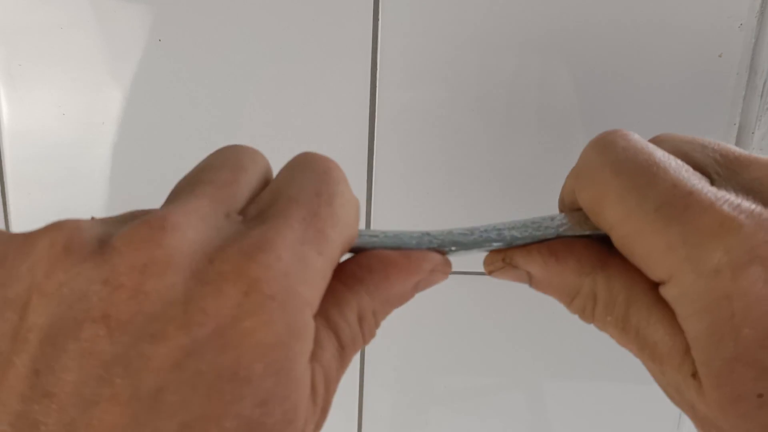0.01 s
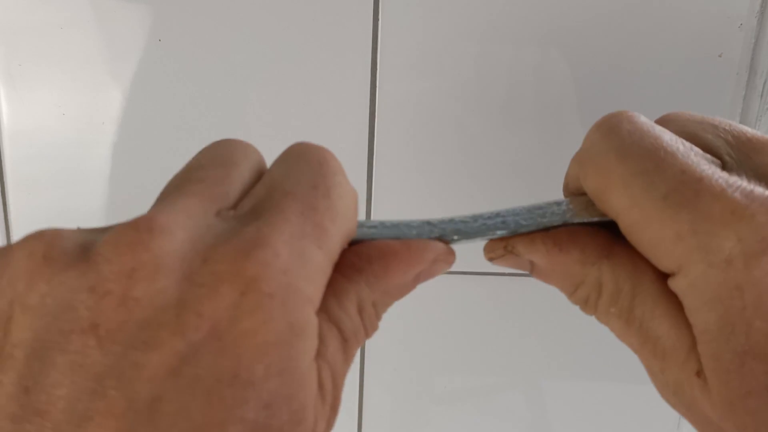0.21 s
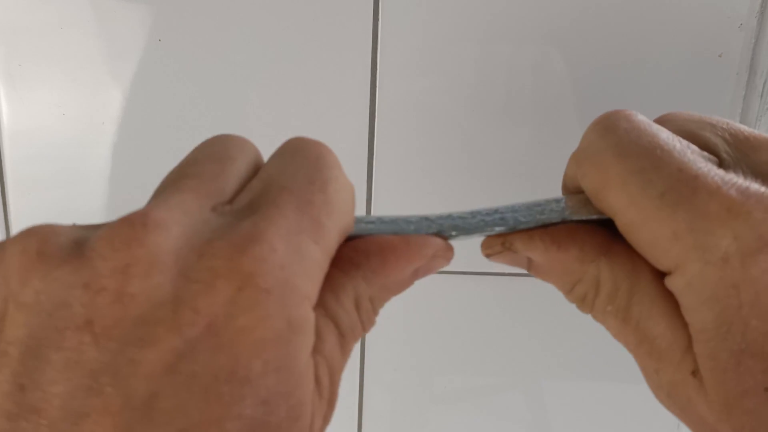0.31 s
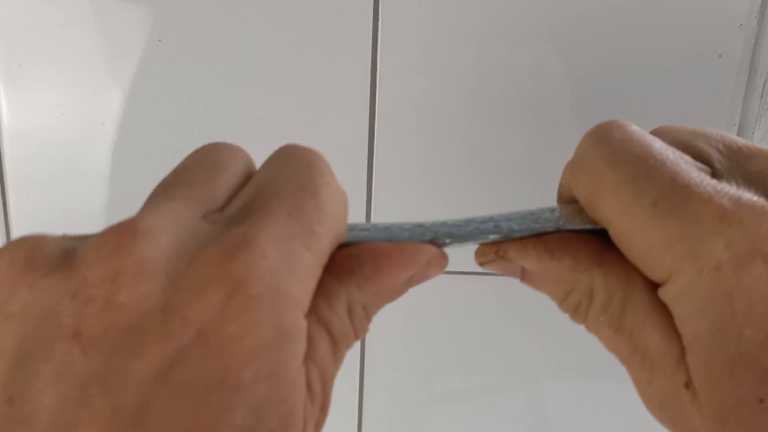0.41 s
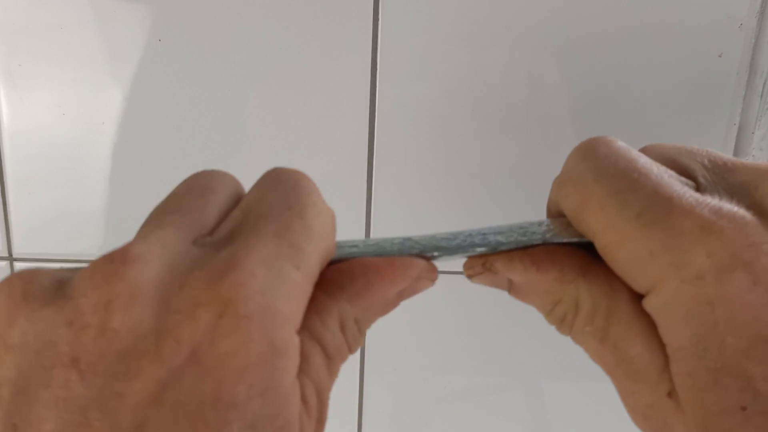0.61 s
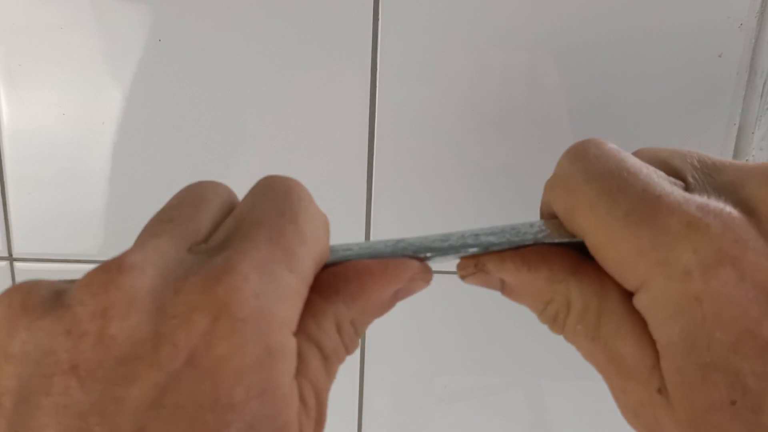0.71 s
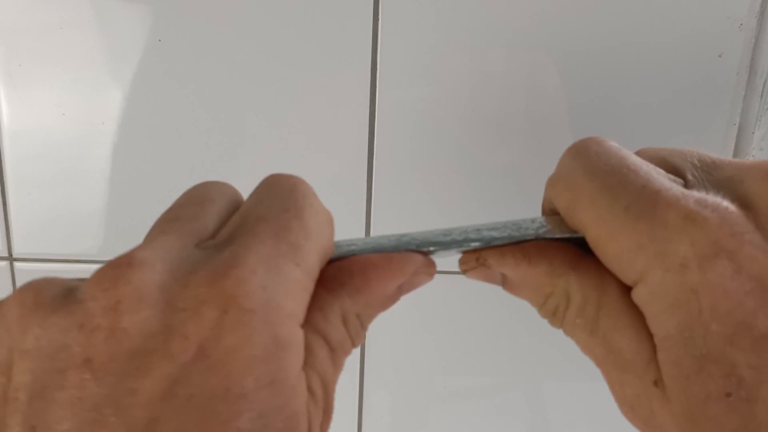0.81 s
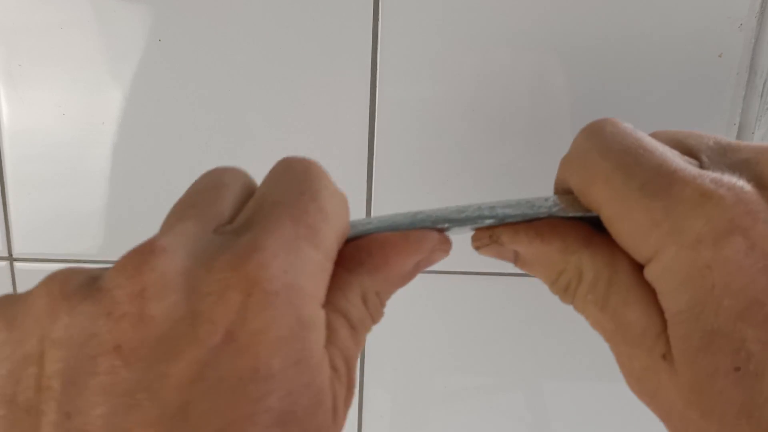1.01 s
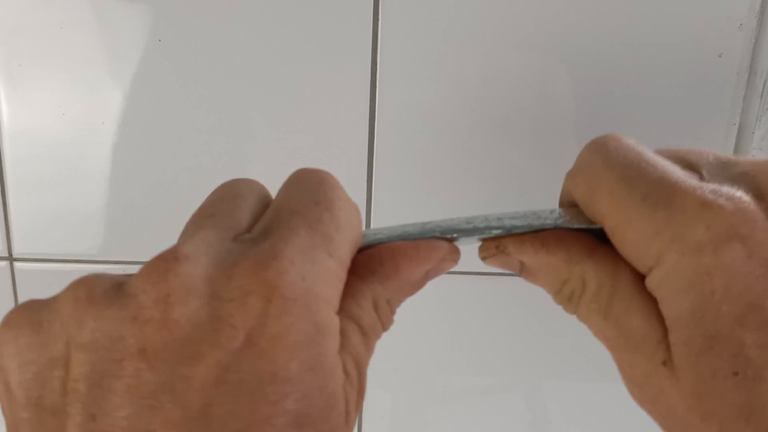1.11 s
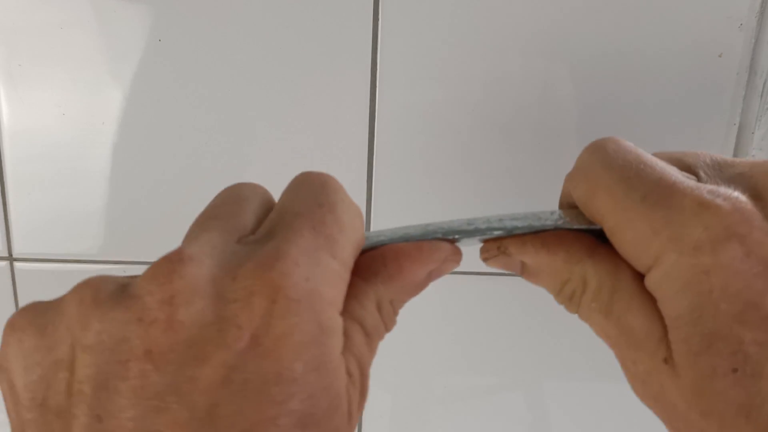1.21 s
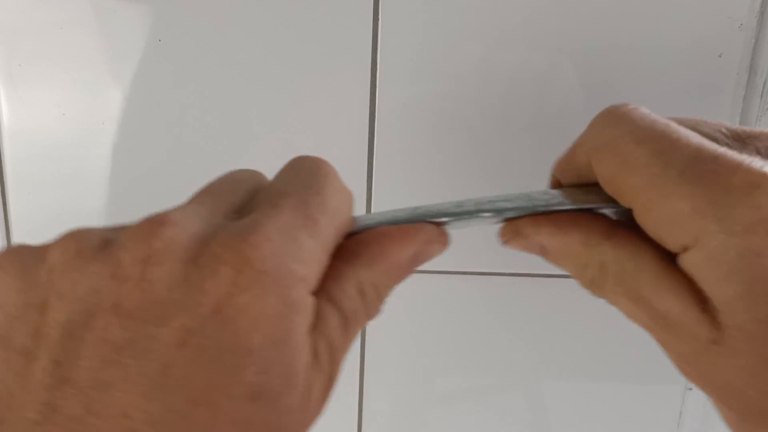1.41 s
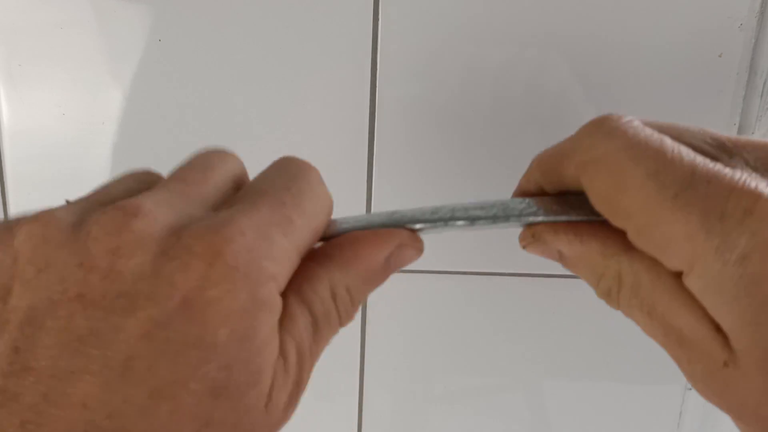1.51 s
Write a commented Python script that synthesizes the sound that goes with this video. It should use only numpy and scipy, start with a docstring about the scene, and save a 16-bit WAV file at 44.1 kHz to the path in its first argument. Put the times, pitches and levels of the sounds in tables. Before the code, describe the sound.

A thin metal bar bent by hand crackles in dry, sharp bursts in a small tiled room

```python
"""Cry of a bent zinc bar

A zinc bar is bent by hand close to a two-port microphone above a tiled floor. Crystals slip with dry
snaps, single or in swarms: each is a crack, a dying noise burst and a brief ringing of the hand-damped
bar. The tiles return delayed copies and a small hard room answers with decaying noise. Filtered noise
makes a quiet hiss and rumble; damped sines make finger bumps; a narrow resonance hums on the right.
"""
import sys
import numpy as np
from scipy import signal
from scipy.io import wavfile

SR = 44100
rng = np.random.default_rng(int(sys.argv[2]) if len(sys.argv) > 2 else 0)


def wrap_up_sound(samples):
    """Save the sound to the file named by the first command line argument, as 16-bit audio."""
    columns = np.atleast_2d(samples).T
    # keep every value between -1 and 1, then stretch to whole-number steps
    tamed = np.clip(columns, -1, 1)
    steps = np.round(tamed * 32767).astype(np.int16)
    wavfile.write(sys.argv[1], SR, steps)


def rack_gain(trim_db):
    """Turn a fader trim in dB into the linear factor to multiply a signal by."""
    fader = np.asarray(trim_db, float)
    return 10 ** (fader / 20)


N = 70560

# Single snaps. Each row: time in seconds, relative level in dB, low modes relative to the burst in dB.
SNAPS = [(0.16, -45, -13), (0.1768, -41.5, -11), (0.2, -27, -14.5), (0.2066, -22, -13), (0.2142, -25, -17),
         (0.2193, -16, -11.5), (0.233, -14.5, -27), (0.2421, -7, -14.5), (0.2575, -16, -27),
         (0.277, -21.5, -21), (0.2855, -10, -15), (0.2936, -15, -15), (0.3004, -14, -18),
         (0.3048, -10, -16), (0.3073, -11.5, -11), (0.315, -22.5, -9), (0.3167, -13.5, -5),
         (0.3222, -11, -28), (0.3285, -22.5, -6), (0.3331, -12, -11.5), (0.3379, -9.5, -10),
         (0.348, -19, -10), (0.3646, -15.5, -19), (0.393, -17.5, -14), (0.41, -17, -12), (0.464, -7, -14.5),
         (0.4685, -18.5, -9), (0.4731, -10.5, -13.5), (0.4788, -9, -10), (0.5251, -25, -19),
         (0.5389, -15.5, -28), (0.5642, -19, -19), (0.5696, -17, -13), (0.5895, -27, -13),
         (0.6062, -15, -13), (0.6298, -14, -13), (0.649, -4, -16), (0.6856, -19, -13), (0.6916, -17, -25),
         (0.7103, -14, -15.5), (0.7236, -24.5, -13), (0.7408, -10, -19), (0.7751, -13.5, -10),
         (0.814, -5, -13), (0.8714, -15, -17), (0.935, -25, -18), (0.9425, -10, -18.5), (0.9778, -17, -9),
         (1.0134, -2, -10), (1.0289, -17, -10), (1.0603, -24, -9), (1.064, -5.5, -10), (1.0873, -25, -2),
         (1.109, -24, -5), (1.1254, -12, -15), (1.1352, -22, -8), (1.1686, -27, -24), (1.2075, -25, -11),
         (1.2198, -12, -10), (1.2331, -20, -6.5), (1.4735, -33.5, -2.5)]
# Swarm of small slips, following the bending effort. Each row: time in seconds, relative level in dB.
SWARM = [(.19, -75), (.2, -47), (.25, -33), (.28, -35.5), (.33, -21), (.38, -40), (.42, -27.5),
         (.45, -37.5), (.48, -25.5), (.52, -34.5), (.6, -31.5), (.85, -34.5), (.91, -40.5), (1.0, -35.5),
         (1.04, -32), (1.12, -36), (1.19, -46.5), (1.23, -32), (1.26, -75), (1.46, -66), (1.5, -53.5),
         (1.58, -65)]
# Modes of the held bar. Each row: frequency in Hz, relative level in dB, 60 dB decay time in seconds.
BAR_MODES = [(899, -33.5, 0.062), (1160, -25, 0.05), (1447, -19.5, 0.029), (2284, -8, 0.0068),
             (2805, -10, 0.015), (3438, -3, 0.007), (4020, -5, 0.003), (5630, -8.5, 0.0038)]
# Decay of the room. Each row: frequency in Hz, 60 dB decay time in seconds.
ROOM_T60 = [(1000, 0.47), (9000, 0.22), (15000, 0.12)]
# Band favoured by the direct sound. One row: centre in Hz, width in Hz, gain in dB.
FACING = (8980, 1700, 4.56)
# Resonances of the microphone ports. Each row: centre in Hz, width in Hz, gain in dB.
LEFT_PORT = [(8370, 4200, 13.5), (4480, 500, -2.5)]
RIGHT_PORT = [(6536, 4570, 15.5), (4650, 730, -6), (14130, 5700, 12), (9560, 320, 3.5)]
# Dull bumps as the fingers shift. Each row: time in seconds, relative level in dB, frequency in Hz.
BUMPS = [(1.358, -40, 123), (1.363, -46, 253), (1.379, -46, 139), (1.39, -45, 198), (1.411, -47.5, 260)]
# Span of the faint tone. One row: start in seconds, end in seconds.
TONE_SPAN = (.2, .55)
# The faint tone. One row: frequency in Hz, rms level in dB.
TONE = (498, -54.5)
# Background spectrum. Each row: frequency in Hz, relative density in dB per Hz.
HISS = [(25, -4.5), (110, 1), (300, -7), (1800, -8.5), (4000, -12.5), (5000, -19), (8000, -17),
        (15000, -19)]
# Background swell while the bar is worked. Each row: time in seconds, relative level in dB,
# left minus right in dB (level and balance both act less on the treble).
BACKGROUND = [(.15, -56, 9), (.25, -47, 1), (1.2, -49, 2), (1.35, -53.5, 7), (1.6, -53.5, 7)]


def at_hz(points, hz):
    """Interpolation: a table is read on a logarithmic frequency axis."""
    table = np.array(points)
    return np.interp(np.log(hz), np.log(table[:, 0]), table[:, 1])


def in_time(rows):
    """Interpolation: each column of a curve becomes one value a sample."""
    s, *columns = np.transpose(rows)
    return [np.interp(np.arange(N) / SR, s, column) for column in columns]


def train(s, gains):
    """Impulse excitation: clicks of given heights at given times."""
    out = np.zeros(N)
    np.add.at(out, (np.asarray(s) * SR).astype(int), gains)
    return out


def ring(clicks, hz, t60):
    """Damped resonance: a unit click starts a decaying sine of unit initial amplitude."""
    radius = rack_gain(-60 / (t60 * SR))
    angle = 2 * np.pi * hz / SR
    return signal.lfilter([0, np.sin(angle)], [1, -2 * radius * np.cos(angle), radius * radius],
                          clicks + 1e-18)


def delay(x, s):
    """Propagation delay: the sound comes s seconds later, read between samples."""
    return np.interp(np.arange(N) - s * SR, np.arange(N), x, left=0)


def peak(x, hz, width_hz, db):
    """Resonant coloration: a second-order filter raises or lowers one band."""
    angle = 2 * np.pi * hz / SR
    gain = rack_gain(db / 2)
    a = np.sin(angle) * width_hz / hz / 2
    middle = -2 * np.cos(angle)
    return signal.lfilter([1 + a * gain, middle, 1 - a * gain], [1 + a / gain, middle, 1 - a / gain], x)


def bands(noise):
    """Spectral division: half-octave noise bands with centres in Hz; neighbours use unrelated draws."""
    edges = 22 * 2 ** np.arange(0, 9.9, .5)
    for k, (low, high) in enumerate(zip(edges, edges[1:])):
        band = signal.butter(2, [low, high], "band", fs=SR, output="sos")
        yield np.sqrt(low * high), signal.sosfilt(band, noise[k % 2])


def bar():
    """Stick-slip release: each slip cracks, bursts and excites the bar's modes in random proportions."""
    sites = 5  # places along the bend
    slips_per_s, slip_spread_db, slip_low_db = 700, 3.5, -10
    burst_t60_s, burst_db, bright_hz, crack_db = .0008, 9.5, 4530, 9
    low_db, mode_spread_db = 12.5, 2.2
    skirt_share = 0.52  # a mode is cut below this share of its pitch
    push_db, push_hz = 14, 684

    s, db, snap_low_db = np.transpose(SNAPS)
    swarm_db, = in_time(SWARM)
    spread = slip_spread_db * np.minimum(rng.exponential(1, N), 2.5)
    slips = (rng.random(N) < slips_per_s / SR) * rack_gain(swarm_db + spread)
    site = rng.integers(0, sites, N) == np.arange(sites)[:, None]

    clicks = site * (train(s, rack_gain(db)) + slips) + 1e-18
    envelope = signal.lfilter([1], [1, -rack_gain(-60 / (burst_t60_s * SR))], clicks)
    burst = (envelope + rack_gain(crack_db) * clicks) * rng.choice([-1, 1], N)
    bright = signal.sosfilt(signal.butter(2, bright_hz, "high", fs=SR, output="sos"), burst)

    snap_strikes = train(s, rack_gain(db + snap_low_db))
    strikes = snap_strikes + rack_gain(slip_low_db) * slips
    low = 0
    for hz, level_db, t60 in BAR_MODES:
        strength = rack_gain(level_db + mode_spread_db * rng.standard_normal(N)) * rng.choice([-1, 1], N)
        mode = ring(site * (strikes * strength), hz, t60)
        low = low + signal.lfilter(*signal.butter(2, skirt_share * hz, "high", fs=SR), mode)

    # dull jerk of the bar in the hands
    push_band = signal.butter(2, [push_hz / 4, push_hz], "band", fs=SR, output="sos")
    push = rack_gain(push_db) * signal.sosfilt(push_band, snap_strikes)
    return rack_gain(burst_db) * bright, rack_gain(low_db) * low, rack_gain(low_db) * push


def room(sites):
    """Reflection and reverberation: each site has its own tile echo, early cluster and tail per port."""
    room_db, room_start_s, room_cut_hz = -32, 0.0022, 1230
    early_db, early_t60_s = -26.5, 0.039
    echo_s, echo_db, echo_spread_s = 0.0015, -4, 0.0002786

    count = len(sites)
    t = np.arange(SR // 2) / SR
    early = rack_gain(early_db - 60 * t / early_t60_s)
    tail = 0
    for hz, band in bands(rng.standard_normal((2, 2, count, len(t)))):
        tail = tail + band * (rack_gain(room_db - 60 * t / at_hz(ROOM_T60, hz)) + early)
    tail = tail * np.clip(t / room_start_s, 0, 1)
    tail = signal.lfilter(*signal.butter(1, room_cut_hz, "high", fs=SR), tail)  # thin in the bass
    wet = signal.fftconvolve(sites[None], tail, axes=2)[..., :N].sum(axis=1)

    lags = echo_s + echo_spread_s * rng.uniform(-0.91, 1, (2, count))
    echoes = np.array([sum(map(delay, sites, row)) for row in lags])
    return wet + rack_gain(echo_db) * echoes


def fingers():
    """Damped low resonance: soft bumps ring briefly, stronger on the left."""
    bump_t60_s, cut_hz = 0.043, 430
    bumps = sum(ring(train([s], rack_gain(db)), hz, bump_t60_s) for s, db, hz in BUMPS)
    return signal.lfilter(*signal.butter(2, cut_hz, fs=SR), bumps) * rack_gain(np.array([[2.5], [-2.5]]))


def tone():
    """Selective resonance: noise feeds a narrow resonator, heard as a faint tone on the right only."""
    (start, end), (hz, db) = TONE_SPAN, TONE
    t = np.arange(N) / SR
    active = (t > start) & (t < end)
    sound = ring(rng.standard_normal(N) * active, hz, .25)
    return rack_gain(db) * sound / np.std(sound[active]) * [[0], [1]]


def background():
    """Partial coherence: stereo noise is alike in the bass; its treble follows the swell only in part."""
    hiss_db, treble_follows = 1.5, 0.58
    low_alike, alike_hz = 0.6, 497
    db, pan_db = in_time(BACKGROUND)
    swell_db = db - db[-1] + pan_db * [[.5], [-.5]]
    out = 0
    for hz, (mid, side) in bands(rng.standard_normal((2, 2, N))):
        alike = np.clip(low_alike / (1 + hz / alike_hz), 0, 1)
        follows = treble_follows + (1 - treble_follows) / (1 + (hz / 2000) ** 2)
        gain = rack_gain(at_hz(HISS, hz) + follows * swell_db)
        out = out + gain * (np.sqrt(1 + alike) * mid + np.sqrt(1 - alike) * side * [[1], [-1]])
    # the last tenth of a second sets the level
    return out * rack_gain(BACKGROUND[-1][1] + hiss_db) / np.std(out[:, -SR // 10:])


def scene():
    """Superposition: direct and reflected bar sound, coloured by each port, over the background."""
    left_lag_s, left_db, level_db = .0001, 2.5, -15.5
    bright, low, push = bar()
    direct = peak(bright.sum(axis=0), *FACING)
    both = np.array([delay(direct, left_lag_s), direct])  # only the bright part arrives late
    left, right = both + low.sum(axis=0) + push + room(bright + low)
    for row in LEFT_PORT:
        left = peak(left, *row)
    for row in RIGHT_PORT:
        right = peak(right, *row)
    coloured = rack_gain(level_db) * np.array([rack_gain(left_db) * left, right])
    return coloured + background() + fingers() + tone()


def low_pass(x):
    """Removes everything above the highest recorded frequency."""
    return signal.sosfilt(signal.butter(12, 16640, fs=SR, output="sos"), x)


def record(dry):
    """Saturation and band limiting: peaks are rounded and the top of the spectrum is cut."""
    rounded = .78 * np.tanh(dry / .78)
    # 70 dB down from 16400 Hz upward
    cut = signal.sosfilt(signal.cheby2(14, 70, 16400, fs=SR, output="sos"), rounded)
    return low_pass(cut)


dry = scene()
out = record(dry)
wrap_up_sound(out)
```